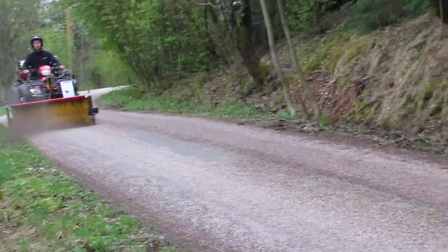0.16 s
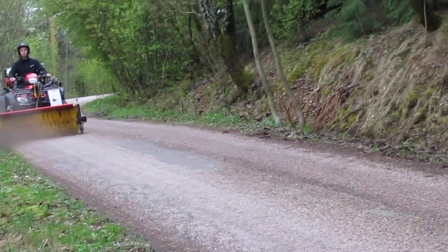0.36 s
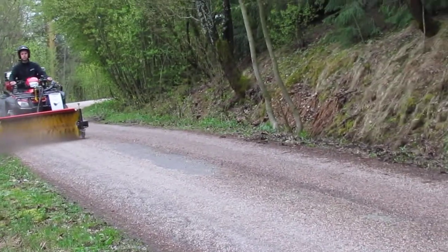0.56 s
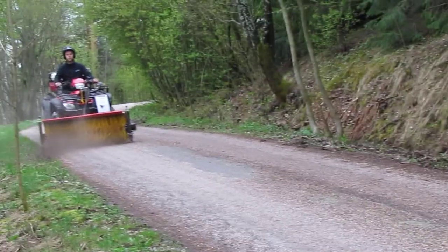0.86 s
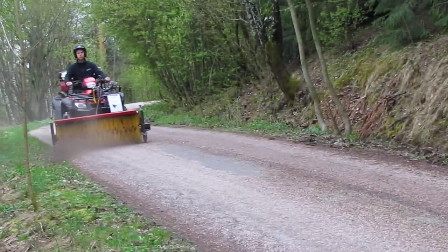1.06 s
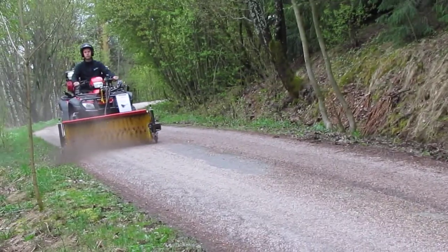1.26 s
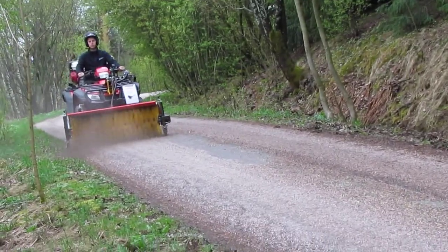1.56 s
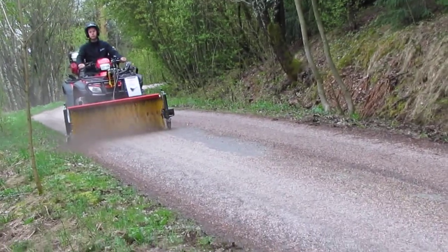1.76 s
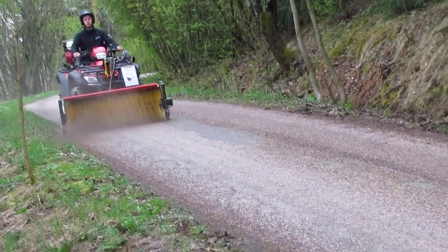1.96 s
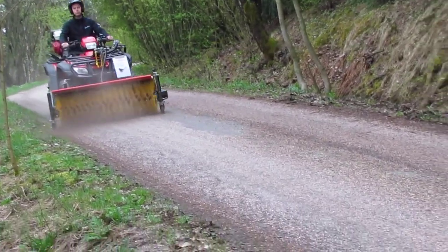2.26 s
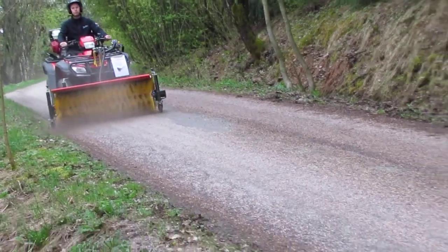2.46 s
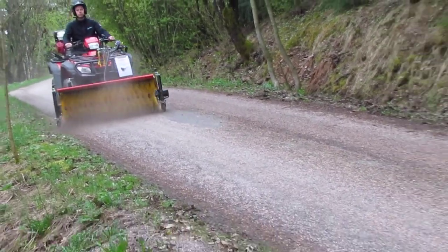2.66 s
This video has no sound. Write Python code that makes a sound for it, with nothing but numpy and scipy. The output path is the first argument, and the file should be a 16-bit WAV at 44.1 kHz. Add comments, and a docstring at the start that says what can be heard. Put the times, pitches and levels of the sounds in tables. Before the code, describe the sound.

A spinning sweeper brush hisses over a gravel road, a quad bike engine thudding behind.

```python
"""A bright hiss of flung grit, heard from the verge of a gravel road on a stereo microphone.
It comes from a spinning sweeper brush, pushed slowly nearer by a quad bike: the bristles scrub and
slap the road, and the hood over them drums. Behind the brush, in the centre, a single-cylinder
engine thuds at a steady low speed, its valves ticking. Everything sounds from the start."""
import sys
import numpy as np
from scipy import signal
from scipy.fft import rfft, irfft, next_fast_len
from scipy.io import wavfile
from scipy.ndimage import uniform_filter1d, map_coordinates

SR = 44100
rng = np.random.default_rng(int(sys.argv[2]) if len(sys.argv) > 2 else 0)


def unload_wav(signal):
    """Save mono or channel-first audio to the path in sys.argv[1] as 16-bit WAV at rate SR, clipped to [-1, 1]."""
    wavfile.write(
        sys.argv[1],
        SR,
        np.round(np.clip(np.atleast_2d(signal).T, -1, 1) * 32767).astype(np.int16),
    )


N = 124362


def amp(db):
    """Decibels to gain."""
    return 10 ** (np.asarray(db) / 20)


def unit(x):
    """Scaled to rms 1."""
    return x / np.sqrt(np.mean(x ** 2) + 1e-20)


def along(points, hz):
    """(Hz, value) points joined on a log axis."""
    f, v = np.transpose(points)
    return np.interp(np.log(hz + 1), np.log(f + 1), v)


def curve(rows):
    """(s, value) points, one value per sample."""
    return np.interp(np.arange(N) / SR, *np.transpose(rows))


def wobble(per_s):
    """A smooth random curve, per_s knots a second."""
    return map_coordinates(rng.standard_normal(1024), [np.arange(N) * per_s / SR], mode="wrap")


def filtered(x, response):
    """x through a complex response of frequency."""
    size = next_fast_len(N + SR // 2)
    return irfft(rfft(x, size) * response(np.fft.rfftfreq(size, 1 / SR)), size)[..., :N]


def patchy(depth_db):
    """Two noises with patches of random gain in time and frequency."""
    spectra = signal.stft(rng.standard_normal((2, N)), nperseg=256)[2]
    patches = uniform_filter1d(rng.standard_normal(spectra.shape[1:]), size=9, axis=0)
    patches = unit(uniform_filter1d(patches, size=16, axis=1))
    return unit(signal.istft(spectra * amp(depth_db * patches), nperseg=256)[1][:, :N])


def impacts(per_s, spread_db, life_s):
    """Two streams of tiny cracks, sharing random times and sizes."""
    hits = (rng.random(N) < per_s / SR) * amp(spread_db * np.clip(rng.standard_normal(N), -2, 2))
    energy = signal.lfilter([1], [1, -np.exp(-2 / (life_s * SR))], hits ** 2)
    return unit(np.sqrt(energy) * rng.standard_normal((2, N)))


# The brush at the microphone. Each row: frequency in Hz, left-right likeness from 0 to 1.
MIC_LIKENESS = [(160, .9999), (280, 1), (420, 1), (1000, .975), (1900, 0.99), (2400, 0.7), (3600, 0.97),
                (4000, 0.41), (4400, 0.82), (4750, 0.26), (5200, 0.54), (6000, 1), (9000, 0.68),
                (12000, 0.96), (14000, 0.73), (15300, .5)]
# Each row: frequency in Hz, left minus right in dB.
MIC_BALANCE = [(1800, -0.5), (2300, -2), (3800, 0.5), (4300, 6.5), (5000, 4), (5900, 3.5), (7000, -3.5),
               (8200, -1.6), (10200, 2.5), (11400, -0.5), (13000, -4), (15500, 1)]
# Each row: frequency in Hz, lead of the left side in radians.
MIC_LEAD = [(2000, -0.125), (2600, 0.42), (3500, 0.81), (4000, 1), (4650, 1.1), (5000, -0.83),
            (6000, -0.52), (7400, -0.42), (8600, 0.34), (10000, 0.24), (11500, 0.77), (12600, 0.64),
            (14500, 1.05)]

def at_microphone(pair, spectrum):
    """Colours a wide source and spreads it over the two sides of the microphone."""
    def mid_side(hz):
        angle = np.arccos(np.clip(along(MIC_LIKENESS, hz), -1, 1)) / 2
        return amp(along(spectrum, hz)) * [np.cos(angle), np.sin(angle)]

    def left_right(hz):
        half = np.array([[.5], [-.5]])
        return amp(half * along(MIC_BALANCE, hz)) * np.exp(1j * half * along(MIC_LEAD, hz))

    mid, side = filtered(pair, mid_side)
    return unit(filtered(np.array([mid + side, mid - side]), left_right))


# Grit in the air over the road. Each row: time in seconds, relative level in dB.
SPRAY_LEVEL = [(0, -18.5), (.22, -18.5), (.33, -19), (.62, -18.5), (.74, -18), (1, -18.2), (1.22, -16.5),
               (1.34, -18), (1.44, -17), (1.63, -19), (1.84, -17), (2.02, -17.5), (2.25, -18),
               (2.45, -18.5), (2.58, -18), (2.82, -18.5)]
# Its bright hiss. Each row: frequency in Hz, relative level in dB.
SPRAY_SPECTRUM = [(2000, -25), (4000, -21), (5200, -7.5), (6800, -8.5), (7700, -3), (8600, 0.8),
                  (10200, -1.8), (11600, -2.5), (12700, -8), (13700, -9.5), (15300, -20.5), (17000, -27)]
# The lower hiss of the road close to the microphone. Each row: frequency in Hz, relative level in dB.
NEAR_SPECTRUM = [(3500, -28.5), (5000, -14), (6500, -1), (7900, 3), (9200, 0.5), (11000, -8), (15000, -23)]
NEAR_DB, NEAR_DB_PER_S = -13.5, 3  # against the bright hiss

def grit_spray():
    """Countless flung grains merge into a hiss that fills out as the brush nears."""
    grit = rng.standard_normal((2, N)) + amp(-7.5) * impacts(per_s=3000, spread_db=6, life_s=0.0012)
    approach = amp(NEAR_DB + NEAR_DB_PER_S * np.arange(N) / SR)
    near = approach * at_microphone(patchy(depth_db=1.9), NEAR_SPECTRUM)
    level = amp(curve(SPRAY_LEVEL) + 0.22 + 0.16 * wobble(per_s=70))
    return level * (at_microphone(grit, SPRAY_SPECTRUM) + near)


# Bristles on gravel, from the verge. Each row: time in seconds, level in dB.
SCRUB_LEVEL = [(0, -30), (.5, -30.5), (.8, -30), (1.3, -29), (1.65, -31.5), (2, -30.5), (2.4, -32),
               (2.82, -31.5)]
# Their rasp. Each row: frequency in Hz, relative level in dB.
SCRUB_SPECTRUM = [(200, -21), (500, -0.5), (820, -7.5), (1200, -1.5), (1500, -3.5), (1850, 0), (2250, -2.5),
                  (2800, 0.5), (3500, -0.5), (3950, -3.5), (5000, -3), (8000, -31)]

def bristle_scrub():
    """Bristles rasp over the road and knock small stones about."""
    rasp = patchy(depth_db=0.5)
    stones = amp(-11.5) * impacts(per_s=260, spread_db=9.5, life_s=0.0014)
    level = amp(curve(SCRUB_LEVEL) + 0.12 * wobble(per_s=31.64))
    return level * at_microphone(rasp + stones, SCRUB_SPECTRUM)


# Bristles striking the road, straight ahead. Each row: time in seconds, level in dB.
SLAP_LEVEL = [(0, -33), (.15, -28.5), (.55, -38.5), (.8, -28.5), (1.1, -34), (1.45, -33), (1.7, -35.5),
              (2.25, -35), (2.45, -38), (2.82, -30.5)]
# Their rumble. Each row: frequency in Hz, relative level in dB.
SLAP_SPECTRUM = [(10, -45), (30, -11.5), (60, -3), (90, -5.5), (118, 5.5), (160, -3), (210, -12.5),
                 (300, -18.5), (450, -37.5), (1000, -51)]
SLAPS_PER_S, SLAP_DRIFT_CYCLES, SLAP_SWING_DB = 19.7, 0.21, 4

def bristle_slap():
    """Row after row of bristles beats the road: a rough, throbbing rumble."""
    rows = SLAPS_PER_S * np.arange(N) / SR + SLAP_DRIFT_CYCLES * wobble(per_s=2.97)
    beats = rng.standard_normal(N) * amp(SLAP_SWING_DB * np.cos(2 * np.pi * rows))
    return amp(curve(SLAP_LEVEL)) * unit(filtered(beats, lambda hz: amp(along(SLAP_SPECTRUM, hz))))


# The hood, at the front of the bike. Each row: time in seconds, level in dB.
HOOD_LEVEL = [(0, -32), (.2, -37), (.32, -36.5), (.9, -41.5), (1.1, -37), (1.45, -40), (1.65, -40),
              (2.05, -39.5), (2.3, -45), (2.82, -44)]
# Its hollow tone. Each row: frequency in Hz, relative level in dB.
HOOD_SPECTRUM = [(100, -21), (200, -3.5), (260, -5.5), (335, -3), (385, -18.5), (450, -5), (600, -16),
                 (750, -16), (1500, -29.5)]

def hood_drumming():
    """The hood over the brush drums hollowly."""
    return amp(curve(HOOD_LEVEL)) * at_microphone(rng.standard_normal((2, N)), HOOD_SPECTRUM)


# The engine at a crawl. Each row: time in seconds, firings a second.
FIRING_RATE = [(0, 29.66), (.5, 29.72), (.85, 29.62), (1.2, 29.73), (2, 29.76), (2.5, 29.8), (2.82, 29.88)]

def strokes(phase, scatter_db, jitter_s=.00005):
    """One slightly uneven pulse per engine cycle, at the given share of it."""
    cycles = np.cumsum(curve(FIRING_RATE)) / SR
    due = np.interp(np.arange(int(cycles[-1]) + 1) + phase, cycles, np.arange(N), right=2 * N)
    late, size = rng.standard_normal((len(due), 2)).T
    starts = np.abs(due + jitter_s * SR * late).astype(int)
    return np.bincount(starts, amp(scatter_db * size), N)[:N]


# The exhaust, farther off behind the brush. Each row: time in seconds, level in dB.
EXHAUST_LEVEL = [(0, -30.3), (.8, -30.5), (1.3, -30), (1.65, -33), (2.05, -32), (2.4, -33), (2.82, -34.5)]
# The tone of the pipe. Each row: multiple of the firing rate, relative level in dB.
EXHAUST_HARMONICS = [(1, -19), (2, -9), (3, -7), (4, -10), (5, 0), (6, -3), (7, -15), (8, -9), (9, -5),
                     (10, -12), (11, -21), (12, -8), (13, -13), (14, -16), (15, -15), (16, -12), (17, -11),
                     (18, -15), (19, -11), (20, -12), (21, -20), (22, -18), (23, -27), (24, -22)]
SILENCER_HZ, SILENCER_WIDTH_HZ = [165.8, 535.6], 17

def exhaust():
    """Each firing rings the pipe; the silencer's box resonances hold it back and smear it."""
    def silencer(hz):
        lag = sum(np.arctan2(hz * SILENCER_WIDTH_HZ, box ** 2 - hz ** 2) for box in SILENCER_HZ)
        return np.exp(-2j * lag)

    order, db = np.transpose(EXHAUST_HARMONICS)
    multiple = np.fft.rfftfreq(SR, 1 / SR) / np.mean(curve(FIRING_RATE))
    skirts = np.minimum(multiple + .01, 1) ** 2 / np.maximum(multiple / order[-1], 1) ** 4
    cepstrum = irfft(np.log(amp(np.interp(multiple, order, db)) * skirts))
    cepstrum[1:SR // 2] *= 2  # minimum phase: a sudden puff, then its ring
    cepstrum[SR // 2:] = 0
    pipe = irfft(np.exp(rfft(cepstrum)))[:SR // 2]
    puffs = signal.fftconvolve(strokes(phase=0, scatter_db=1.4), pipe)[:N]
    return amp(curve(EXHAUST_LEVEL)) * unit(filtered(puffs, silencer))


# Ticks from the engine, in the centre. Each row: share of the cycle, relative level in dB.
VALVE_TICKS = [(0.0, 3), (.61, -1.5), (.8, -7)]
# The casing's modes. Each row: frequency in Hz, relative level in dB, seconds to fall 60 dB.
CASING_MODES = [(1002, -2, .08), (1157, 0, 0.14), (1268, 2.5, 0.19), (1347, -0.5, 0.12), (1431, -10, .12),
                (1880, -6, 0.017)]

def valves():
    """The valve gear ticks against the engine casing and rings it."""
    t = np.arange(SR // 4) / SR
    ring = sum(amp(db - 60 * t / t60) * np.sin(2 * np.pi * hz * t) for hz, db, t60 in CASING_MODES)
    ticks = sum(amp(db) * strokes(phase, scatter_db=1.5) for phase, db in VALVE_TICKS)
    return amp(-41.5) * unit(signal.fftconvolve(ticks, ring)[:N])


# Open air around the verge. Each row: frequency in Hz, relative level in dB.
AIR_SPECTRUM = [(20, -2), (150, -12), (350, 4), (700, 0), (1500, -12), (4000, -40)]

def open_air():
    """A faint low wash from all round, unrelated at the two sides of the microphone."""
    wash = filtered(rng.standard_normal((2, N)), lambda hz: amp(along(AIR_SPECTRUM, hz)))
    return amp(-58) * unit(wash)


# The brush from the verge, widest at the start. Each row: time in seconds, side gain in dB.
BRUSH_WIDTH = [(0, 2), (.7, 0.5), (1.2, -1.2), (2.82, -0.7)]

def scene():
    """The wide brush in front, the engine in the centre behind it."""
    engine = exhaust() + valves()
    brush = bristle_slap() + hood_drumming() + bristle_scrub() + grit_spray()
    centre = brush.mean(axis=0)
    sides = amp(curve(BRUSH_WIDTH)) * (brush - centre)
    return centre + sides + engine + open_air()


TOP_HZ = 15750

def record(dry):
    """The camera on the verge keeps nothing above its band limit."""
    return filtered(dry, lambda hz: hz < TOP_HZ)


dry = scene()
out = record(dry)
unload_wav(out)
```